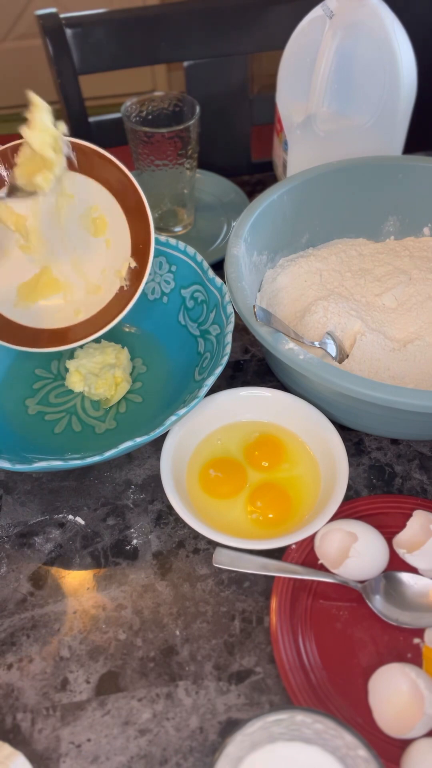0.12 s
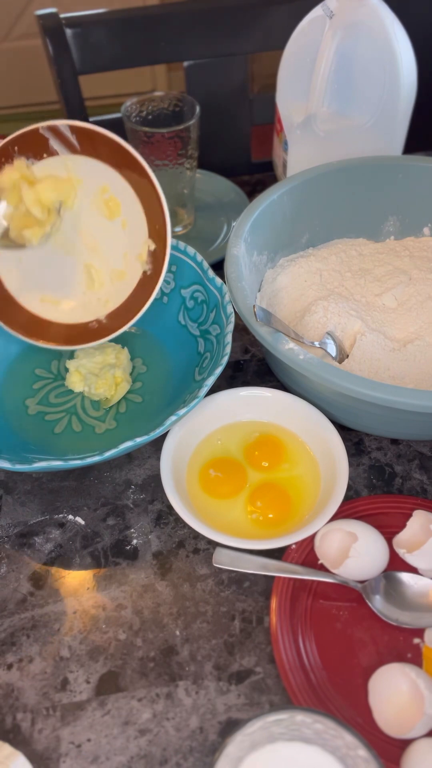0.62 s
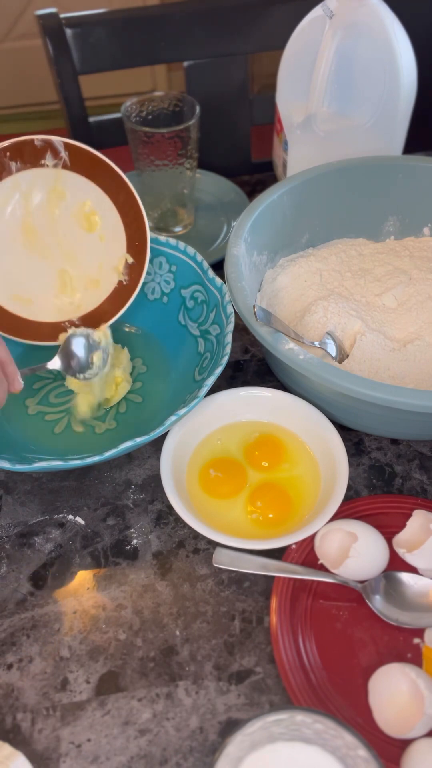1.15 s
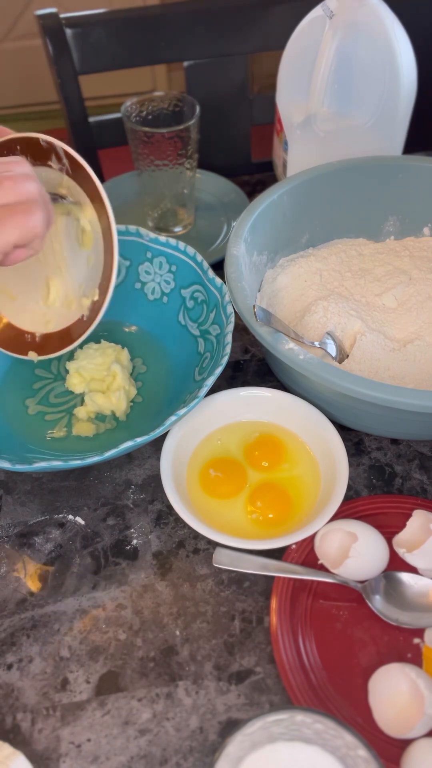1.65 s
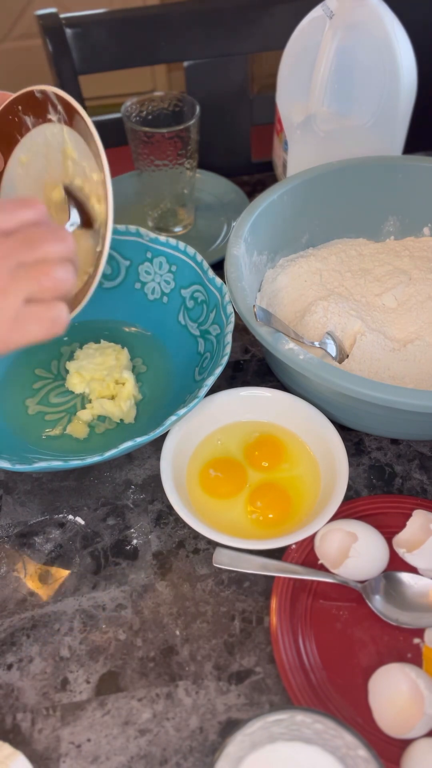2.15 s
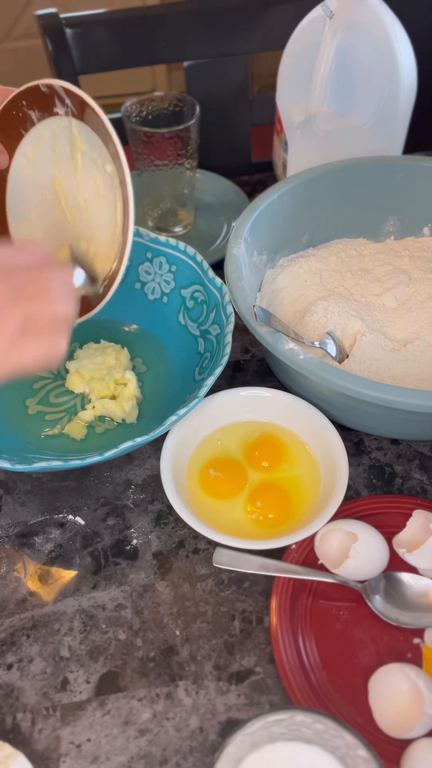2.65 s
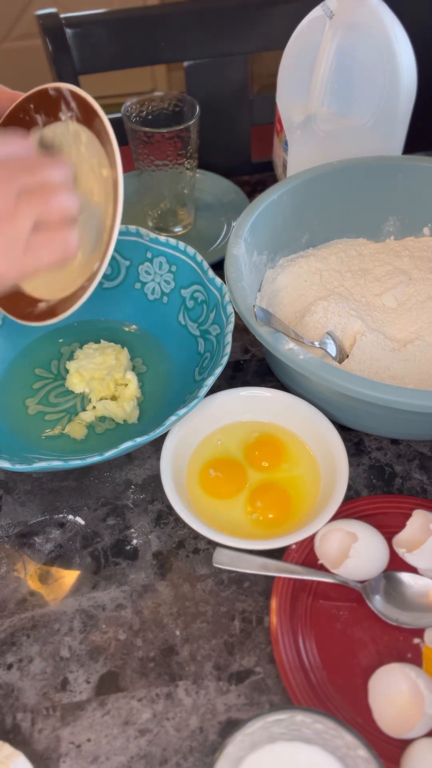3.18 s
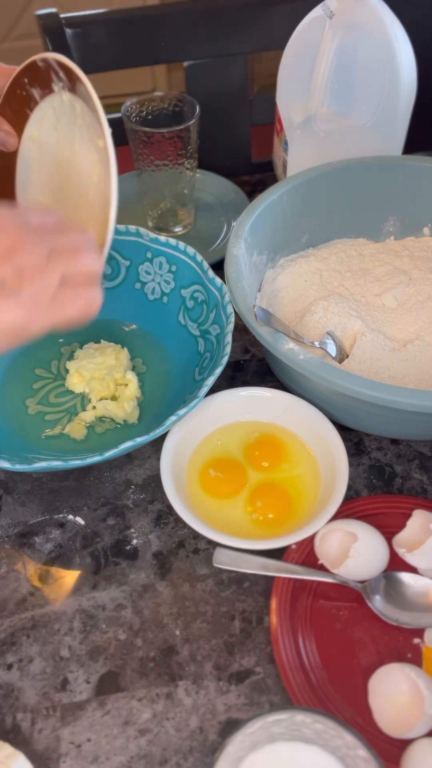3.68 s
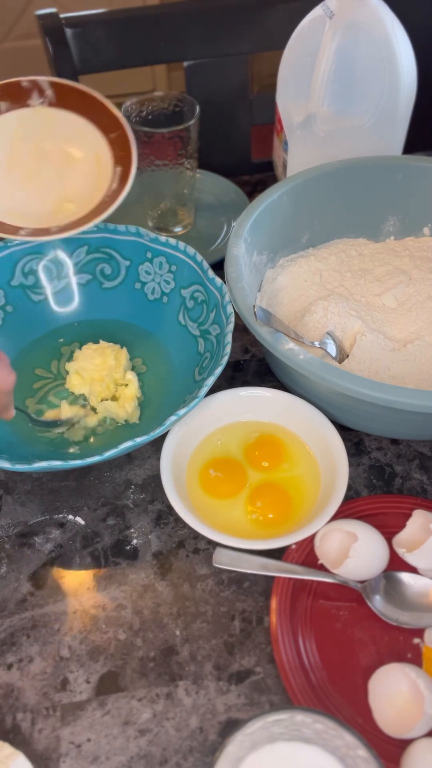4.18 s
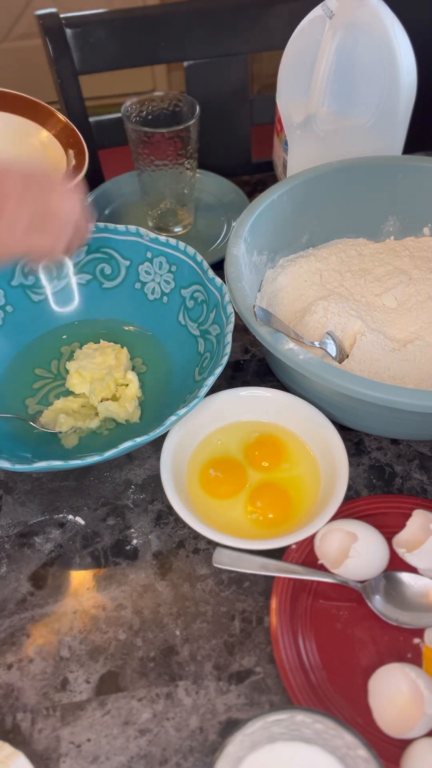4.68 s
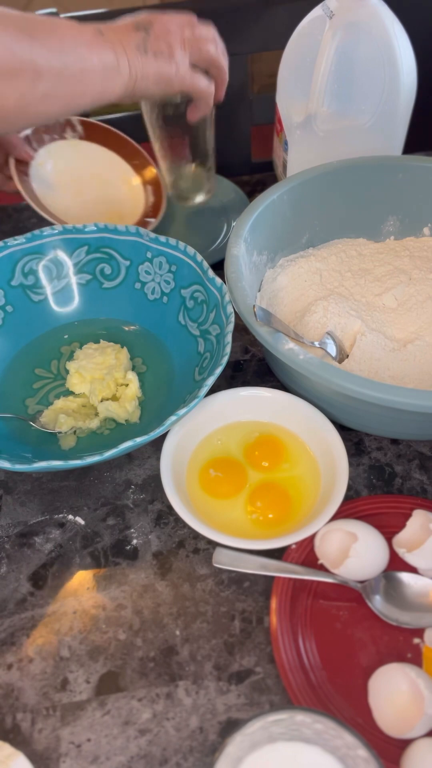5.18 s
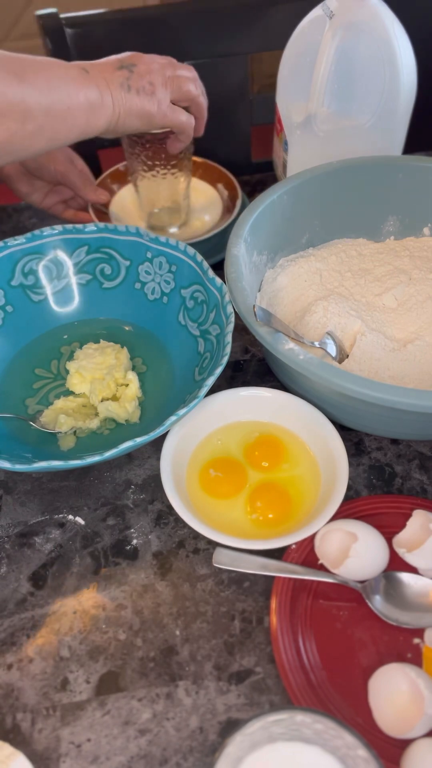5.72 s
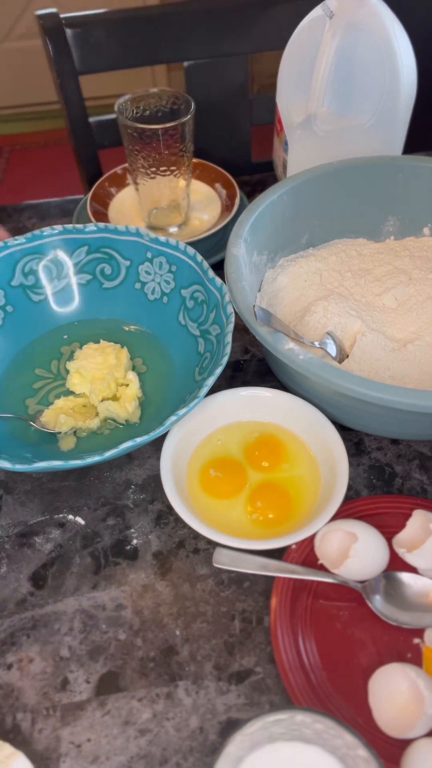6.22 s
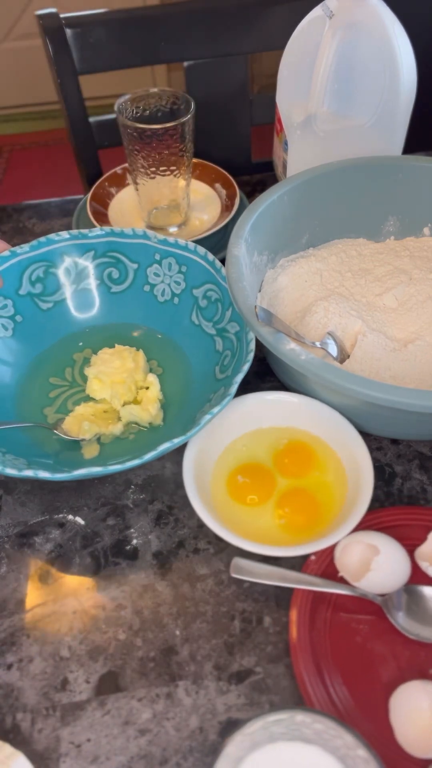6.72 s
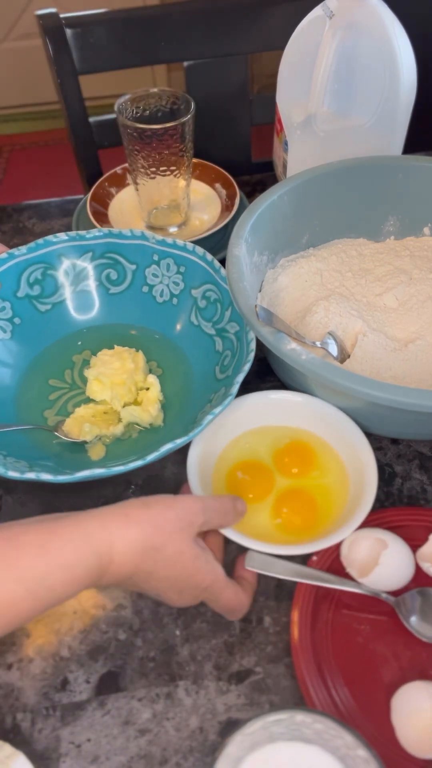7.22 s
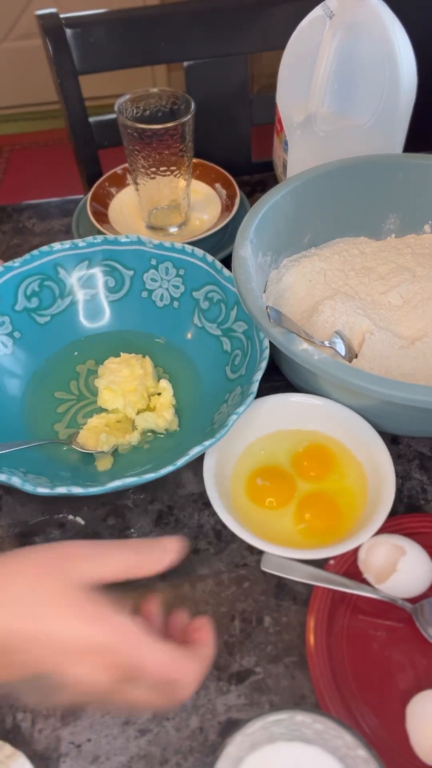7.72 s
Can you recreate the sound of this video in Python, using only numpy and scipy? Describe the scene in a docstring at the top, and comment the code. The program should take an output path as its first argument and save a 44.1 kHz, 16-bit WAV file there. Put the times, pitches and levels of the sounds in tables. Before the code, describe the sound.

A metal spoon scrapes and clinks sharply against a hand-held saucer, then dishes knock together, slide on stone and clink beside a soft appliance hum.

```python
"""Spoon, saucer and crockery on a stone counter

A kitchen, heard from close by on a phone with two microphone ports. A steel spoon taps and scrapes a
hand-held saucer, then drops into a ceramic mixing bowl. The saucer and a tumbler are stacked, a crock is
set down, a small bowl is pulled over the stone and clinks. Blows are decaying modes with a noise crack and
a counter thud; scrapes and drags are grit noise through damped modes; an appliance hums as shaped noise."""
import sys
import numpy as np
from scipy import signal
from scipy.fft import rfft, irfft, next_fast_len
from scipy.io import wavfile
from scipy.ndimage import uniform_filter1d, map_coordinates

SR = 44100
rng = np.random.default_rng(int(sys.argv[2]) if len(sys.argv) > 2 else 0)


def to_wav(sig):
    """Store sig (one row per channel, or 1-D mono) as 16-bit WAV at the path in sys.argv[1].

    Samples outside -1..1 are clipped; the rate is SR.
    """
    pcm = np.clip(np.atleast_2d(sig), -1, 1) * 32767
    pcm = np.round(pcm).astype(np.int16)
    wavfile.write(sys.argv[1], SR, pcm.T)  # frames by channels


def amplitude_ratio(level_db):
    """Convert a level in decibels to the matching linear amplitude (field) ratio."""
    exponent = np.asarray(level_db, float) / 20
    return 10 ** exponent


N = 346626  # length in samples


def unit(x):
    """Scaled to rms 1."""
    return x / np.sqrt(np.mean(x ** 2) + 1e-20)


def peak(x):
    """Scaled to peak 1."""
    return x / np.abs(x).max()


def along(points, hz, column=1):
    """A column of (Hz, value, ..) points, read between them on a log frequency axis."""
    table = np.transpose(points)
    return np.interp(np.log(hz + 1), np.log(table[0] + 1), table[column])


def filtered(x, response):
    """x with its spectrum multiplied by a (complex) function of frequency."""
    m = next_fast_len(x.shape[-1] + 8192)
    return irfft(rfft(x, m) * response(np.fft.rfftfreq(m, 1 / SR)), m)[..., :x.shape[-1]]


def wander(spacing):
    """Smooth random curve through a new normal value every so many samples."""
    return map_coordinates(rng.standard_normal(N // spacing + 4), [np.arange(N) / spacing])


# How alike scattered sound is at the two ports. Each row: frequency in Hz, left-right correlation.
PORT_LIKENESS = [(100, .99), (250, .93), (520, .3), (1500, .6), (3500, .2), (5000, .5), (6500, .8),
                 (8500, .97), (10200, .9), (11700, .4), (13000, .97)]


def diffuse(size):
    """A left-right pair of noises, mixed from mid and side to be as alike as scattered sound is at the ports."""
    turn = lambda hz: np.arccos(along(PORT_LIKENESS, hz)) / 2
    shares = lambda hz: np.array([np.cos(turn(hz)), np.sin(turn(hz))])
    mid, side = filtered(rng.standard_normal((2, size)), shares)
    return np.array([mid + side, mid - side])


# Spectrum of the hum, only its shape counts. Each row: frequency in Hz, density in dB per Hz.
HUM = [(30, -14), (55, 8.5), (123, -5), (217, -7.5), (335, -9), (818, -27.5), (1940, -35), (3080, -40),
       (4370, -34.5), (8000, -45), (16000, -52)]
# Fuzzy tones of the appliance. Each row: centre in Hz, half width in Hz, rms in dB before its drift.
WHINE = [(120, 24, -62), (2100, 730, -78), (4530, 44, -82.5)]


def appliance():
    """A broad hum of shaped noise with a few fuzzy narrow bands that drift in level."""
    hum = amplitude_ratio(-56.5) * unit(filtered(diffuse(N), lambda hz: amplitude_ratio(along(HUM, hz))))
    for centre, width, db in WHINE:
        tone = unit(filtered(diffuse(N), lambda hz: 1 / (1 + ((hz - centre) / width) ** 2)))
        hum = hum + amplitude_ratio(db + 0.7 * wander(8000)) * tone
    return hum


# How long the kitchen rings. Each row: frequency in Hz, t60 in seconds.
KITCHEN = [(100, 0.57), (500, 0.35), (2000, 0.41), (6000, 0.32), (12000, 0.094)]


def kitchen(x, wet_db):
    """The direct sound, close echoes off dishes and counter, then a fresh diffuse tail dying by frequency."""
    hz, t, z = signal.stft(diffuse(SR // 3), SR, nperseg=256)
    close = amplitude_ratio(1.0 - 60 * t / 0.1)
    decay = amplitude_ratio(-60 * t / along(KITCHEN, hz)[:, None]) + close
    tail = signal.istft(z * decay, SR, nperseg=256)[1]
    tail = tail / np.linalg.norm(tail[0])
    tail = np.pad(tail, ((0, 0), (round(.0008 * SR), 0)))  # nearest reflection 0.8 ms late
    return x + amplitude_ratio(wet_db) * signal.fftconvolve(x[None], tail, axes=1)[:, :len(x)]


def in_pieces(x, wet_db):
    """A long sound hears a new kitchen tail every quarter second."""
    out, step = np.zeros((2, N + SR)), SR // 4
    for i in range(0, N, step):
        piece = np.pad(x[i:i + step], (0, SR // 3))
        out[:, i:i + len(piece)] += kitchen(piece, wet_db)
    return out[:, :N]


# Noise of a hard contact, for crack and grit hiss. Each row: frequency in Hz, relative level in dB.
CRACK = [(150, -39), (600, -5.5), (1500, -4.5), (4000, -4), (8000, -9), (14000, -17), (17000, -42)]


def rubbed(modes, grains_db, broad_db, damping):
    """Uneven grit, rms 1, driving the damped modes of the rubbed thing and hissing by itself."""
    grains = np.minimum(rng.exponential(1, N), 5)
    grit = rng.standard_normal(N) * amplitude_ratio(grains_db * (grains + wander(200)))  # the grains come in clumps

    def response(f):
        total = amplitude_ratio(broad_db + along(CRACK, f))
        for k, (centre, db, t60) in enumerate(modes):
            loss = 1j * f * damping * np.log(1000) / np.pi / t60  # shorter t60, wider resonance
            total = total + (-1) ** k * amplitude_ratio(db) * loss / (centre ** 2 - f ** 2 + loss)
        return total

    return unit(filtered(grit, response))


def swells(rows):
    """The gain of pushes that build up and ease off in bell shapes."""
    s, length, db = np.transpose(rows)[..., None]
    t = np.arange(0, N, 64) / SR
    build_share = 0.53  # of the length spent building up
    side = length * np.where(t < s, build_share, 1 - build_share)
    shape = np.exp(-((t - s) / side) ** 2)
    return np.interp(np.arange(N) / SR, t, np.sqrt(np.sum((amplitude_ratio(db) * shape) ** 2, axis=0)))


# Spoon edge pushed over the glaze. Each row: peak time in seconds, length in seconds, level in dB.
SCRAPES = [(.08, 0.063, -55), (.375, 0.042, -49.5), (.5, 0.17, -56.5), (.6, 0.24, -67), (.78, 0.071, -62),
           (1.8, 0.13, -55), (1.93, 0.049, -54), (2.2, 0.097, -42.5), (2.56, 0.19, -55.5),
           (2.68, 0.083, -50.5), (3.04, 0.064, -46.5), (3.35, 0.074, -48), (3.64, 0.17, -52),
           (3.765, 0.078, -48)]
# Modes of the saucer. Each row: frequency in Hz, relative level in dB, t60 in seconds before grip.
SAUCER = [(935, -6.5, 0.068), (1053, 1, 0.027), (2320, -11, 0.097), (3540, 5, 0.032), (4150, -12.5, 0.032),
          (4535, -1.5, 0.042), (4930, -6.5, 0.03), (5920, -6.5, 0.08), (6310, -14, 0.23), (6334, 11, 0.017),
          (7080, -4.5, 0.025), (8040, 0.5, 0.01)]


def spoon_scrapes():
    """The edge catches and lets go; the tone colour drifts at random between two sets of saucer modes."""
    colour_db = 5 * wander(1500)  # one set up, the other down
    rub = lambda modes: rubbed(modes, grains_db=2.5, broad_db=-11, damping=2.6)
    body = amplitude_ratio(colour_db) * rub(SAUCER[::2]) + amplitude_ratio(-colour_db) * rub(SAUCER[1::2])
    slips_per_s, slip_db, slip_s = 60, 5, .004
    slips = (rng.random(N) < slips_per_s / SR) * rng.random(N)
    catch = 1 + amplitude_ratio(slip_db) * signal.lfilter([1], [1, -np.exp(-1 / (slip_s * SR))], slips)
    return swells(SCRAPES) * unit(catch) * unit(body)


def ring(modes, t, tilt_db, blur_hz, spot_hz=()):
    """Every mode at a slightly random strength, its phase wandering at random so the tone is blurred."""
    hz, db, t60 = np.transpose(modes)[..., None]
    db = db + tilt_db * np.log2(hz / 2000) + rng.normal(0, 1.0, hz.shape)
    for c in spot_hz:
        db = db + 7 * np.exp(-(np.log2(hz / c) / .12) ** 2)  # up to 7 dB louder within about .12 octave
    # smooth steps, so lines blur without hiss
    steps = uniform_filter1d(rng.standard_normal((len(modes), len(t))), size=96, axis=1)
    drift = np.cumsum(steps, axis=1) * np.sqrt(2 * np.pi * abs(blur_hz) / SR)
    return np.sum(amplitude_ratio(db - 60 * t / t60) * np.sin(2 * np.pi * hz * t + drift), axis=0)


MIDDLING_DB = -20  # peak of a middling blow
# Modes of the stone counter; the first row is low rumble of the handled phone, used in drags only.
# Each row: frequency in Hz, relative level in dB, t60 in seconds before grip.
COUNTER = [(70, 22, 0.26), (139.6, -3, 0.073), (186, 2.5, 0.068), (289, 0, 0.096), (347, 6, 0.06),
           (427, 14, 0.018)]


def blows(events, modes, middling_s, doublings, blur_hz, wet_db):
    """A chattering contact rings the thing, cracks, thuds the counter and wakes the kitchen.
    It chatters for middling_s under a middling blow, with so many doublings per 10 dB of strength."""
    out, t = np.zeros((2, N + SR)), np.arange(SR // 3) / SR
    grip = 0.36 + np.exp(-t / 0.016)  # hand and neighbours soak up the first burst
    for s, db, tilt_db, thud_db, crack_db, *spot_hz in events:
        chatter_s = max(middling_s * 2 ** (doublings * (db - MIDDLING_DB) / 10), .0005)
        u = t / chatter_s
        contact = rng.standard_normal(len(t)) * u * np.exp(-4 * u)  # swells and dies
        onset = (1 - np.exp(-2.5 * u)) ** 2
        body = peak(ring(modes, t, tilt_db, blur_hz, spot_hz) * grip * onset)

        def crack_response(hz):
            tilted_db = tilt_db * np.log2(np.maximum(hz, 800) / 2000)
            dull_db = 2.3 * min(tilt_db, 0) * np.log2(np.maximum(hz / 7000, 1))  # blunt blows lose the top
            return amplitude_ratio(along(CRACK, hz) + tilted_db + dull_db)

        crack = peak(filtered(contact, crack_response))
        thud = peak(ring(COUNTER[1:], t, 0, blur_hz=6.3) * grip * (1 - np.exp(-t / 0.0021)))
        sound = body + amplitude_ratio(crack_db) * crack + amplitude_ratio(thud_db) * thud
        out[:, round(s * SR):][:, :len(t)] += amplitude_ratio(db) * kitchen(sound, wet_db)
    return out[:, :N]


# Spoon on the hand-held saucer. Each row: start in seconds, peak of the ring in dB, tilt in dB per octave,
# pitch that the struck spot favours in Hz.
SPOON_TAPS = [(0.291, -41, 1.5, 1000), (0.378, -36.5, 10.5, 7080), (0.398, -44, -3.5, 970),
              (0.492, -38.5, 2.5, 6300), (0.512, -49, 2, 6300), (1.148, -56.5, 1, 1020),
              (1.575, -12.5, 0, 4930), (2.133, -16, 0.5, 5920), (2.193, -33, 11, 6310),
              (2.208, -26, 4, 6166), (2.484, -10, 1.5, 2320), (2.518, -25, 2, 3540),
              (2.921, -37, 0.5, 6310), (3.246, -24, 2, 6310), (3.39, -39.5, 1, 1020),
              (3.546, -14.5, 1.5, 3540), (3.763, -37.5, 5, 6310)]


def spoon_taps():
    """The saucer is in the hand, so the counter hardly thuds; softer taps crack more against their ring."""
    taps = []
    for s, db, tilt_db, spot_hz in SPOON_TAPS:
        crack_db = 2 + 0.1954 * (MIDDLING_DB - db)
        taps.append((s, db, tilt_db, -26.5, crack_db, spot_hz))
    return blows(taps, SAUCER, middling_s=0.0026, doublings=0.12, blur_hz=61.6, wet_db=-1.5)


# The spoon lands in the bowl. Each row: start in seconds, peak of the ring in dB, tilt in dB per octave,
# counter thud and dry crack in dB over the ring.
SPOON_DROP = [(4.173, -24.5, -4.5, 0.5, 14), (4.357, -11.5, 0, -13.5, -2)]
# Modes of the mixing bowl. Each row: frequency in Hz, relative level in dB, t60 in seconds before grip.
MIXING_BOWL = [(1150, 4, 0.022), (1750, 3, 0.05), (2216, 7, 0.05), (2480, 9, 0.05), (2545, 19, 0.04),
               (2885, 8, 0.05), (3350, 8, 0.05), (3800, 3, 0.05), (5841, -4, 0.04)]


def spoon_drop():
    """The falling spoon rings the ceramic mixing bowl's modes."""
    return blows(SPOON_DROP, MIXING_BOWL, middling_s=0.0058, doublings=0.41, blur_hz=50, wet_db=-2.5)


# Dishes dragged on stone, one table a drag: stacking, setting down, pulling the small bowl.
# Each row: time in seconds, body level in dB, grit level in dB.
SHIFT = [(4.8, -80.5, -80), (5.05, -66, -88), (5.27, -80.5, -100)]
SET_DOWN = [(5.959, -69, -73.5), (6.061, -64.5, -95.5), (6.253, -70.5, -65.5), (6.38, -45.5, -59),
            (6.49, -49.5, -66.5), (6.6, -53, -56.5), (6.69, -59.5, -73.5), (6.743, -61, -63.5),
            (6.83, -70, -86.5)]
PULL = [(7.085, -65.5, -85), (7.11, -54, -54.5), (7.19, -44, -88), (7.24, -74.5, -73), (7.3, -58, -80),
        (7.421, -55.5, -60), (7.53, -45.5, -71), (7.58, -50, -68), (7.641, -47.5, -81), (7.86, -58.5, -80)]


def drag_gain(column):
    """The gain of one level column along every drag, silent between them."""
    t, gain = np.arange(N) / SR, np.zeros(N)
    for rows in map(np.transpose, (SHIFT, SET_DOWN, PULL)):
        gain += amplitude_ratio(np.interp(t, rows[0], rows[column], -np.inf, -np.inf))
    return gain


def dish_drags():
    """Grit noise through phone rumble, counter and stack modes, plus hiss through heavily damped crock modes."""
    body = rubbed(COUNTER + STACK[:5], grains_db=3.5, broad_db=-15, damping=6.2)
    sand = rubbed(CROCK[4:], grains_db=5.0, broad_db=0.0, damping=24.0)
    return drag_gain(1) * body + drag_gain(2) * sand


# Knocks of the stacking. Each row: start in seconds, peak of the ring in dB, tilt in dB per octave,
# counter thud and dry crack in dB over the ring.
STACKING = [(5.292, -27, -8.5, 12, 14.5), (5.313, -23, -7.5, -4.5, -3), (5.332, -32.5, -8.5, 12, 4.5),
            (5.435, -30.5, -9.5, 11, 9)]
# Modes of the stack. Each row: frequency in Hz, relative level in dB, t60 in seconds before grip.
STACK = [(827, -8, 0.15), (1562, 4, 0.09), (1992, -0.5, 0.11), (2535, -4, 0.29), (3830, -9, 0.17),
         (4550, -3, 0.23), (5100, 1, 0.073)]


def stacking():
    """Short knocks ring the modes of the stacked dishes."""
    return blows(STACKING, STACK, middling_s=0.0021, doublings=0.08, blur_hz=61.0, wet_db=2.5)


# The tumbler is set. Each row: start in seconds, peak of the ring in dB, tilt in dB per octave,
# counter thud and dry crack in dB over the ring.
TUMBLER_SET = [(5.659, -10.5, -6.5, -5.5, 1.5), (5.751, -31, -5, 13, -5), (5.774, -36.5, -10, 18, 11.5),
               (5.811, -29.5, -16.5, 3.5, -1), (6.029, -56.5, -16.5, 8, 11.5)]
# Modes of the tumbler. Each row: frequency in Hz, relative level in dB, t60 in seconds before grip.
TUMBLER = [(1122, 11.5, 0.02), (1299, 3, 0.052), (1790, 13.5, 0.027), (3650, -0.5, 0.13), (4470, 4, 0.1),
           (5060, -4.5, 0.087), (5870, -2.5, 0.19), (6700, -18, 0.1), (8450, 4.5, 0.098)]


def tumbler():
    """Short knocks ring the tumbler's modes as it joins the stack."""
    return blows(TUMBLER_SET, TUMBLER, middling_s=0.0021, doublings=0.08, blur_hz=39.2, wet_db=3.0)


# The crock meets the stone. Each row: start in seconds, peak of the ring in dB, tilt in dB per octave,
# counter thud and dry crack in dB over the ring.
CROCK_KNOCKS = [(6.272, -21.5, -1, -1.5, -0.5), (6.277, -8, -2, -12.5, -6.5), (6.498, -40, -2, -10, 5),
                (6.588, -44, -9, -6, 14.5)]
# Modes of the crock. Each row: frequency in Hz, relative level in dB, t60 in seconds before grip.
CROCK = [(680, 0, 0.03), (1930, 8, 0.028), (2850, -6, .03), (3230, -4, 0.035), (3570, -7, 0.04),
         (5087, -7, 0.035), (6960, -4, 0.025)]


def crock():
    """Setting down the crock rings its short, dull modes."""
    return blows(CROCK_KNOCKS, CROCK, middling_s=0.0036, doublings=0.23, blur_hz=59, wet_db=-3.5)


# The small bowl's foot stutters. Each row: centre in seconds, half length in seconds, pitch in Hz, level in dB.
GROANS = [(7.1, 0.0036, 1384, -40), (7.129, 0.01, 1960, -37), (7.278, 0.0053, 1490, -41.5)]


def groans():
    """Brief bell-shaped bursts of grit through a single mode each, as the foot stutters."""
    t, out = np.arange(N) / SR, np.zeros(N)
    for s, half, hz, db in GROANS:
        tone = rubbed([(hz, 0, .03)], grains_db=-4.0, broad_db=-40.5, damping=1.3)
        out += amplitude_ratio(db) * np.exp(-((t - s) / half) ** 2) * tone
    return out


# The small bowl clinks. Each row: start in seconds, peak of the ring in dB, tilt in dB per octave,
# counter thud and dry crack in dB over the ring.
BOWL_CLINKS = [(7.155, -32, 0, 0, 0.5), (7.177, -40, -15, 13, 19), (7.273, -49.5, -4, -15, 9),
               (7.350, -44, -5.5, -4, 9), (7.533, -37, -2, -17, 3.5), (7.647, -42, -5.5, 6.5, 19),
               (7.700, -21.5, -5, -6, 5.5), (7.706, -4.5, -2.5, -9, -5.5)]
# Modes of the small bowl. Each row: frequency in Hz, relative level in dB, t60 in seconds before grip.
SMALL_BOWL = [(1230, 2, 0.017), (1801, 5.5, 0.06), (2117, 5, 0.025), (3128, 0, 0.09), (3175, -2, 0.09),
              (3480, -2, 0.03), (4925, -3.5, 0.2), (7030, -3, 0.04)]


def bowl_clinks():
    """Knocks ring the small bowl's modes with little blur."""
    return blows(BOWL_CLINKS, SMALL_BOWL, middling_s=0.0052, doublings=0.51, blur_hz=8.6, wet_db=-4.0)


def scene():
    """Everything in the kitchen: the hum, the friction, the blows."""
    friction = in_pieces(spoon_scrapes() + dish_drags() + groans(), wet_db=-3.0)
    spoon = spoon_taps() + spoon_drop()
    dishes = stacking() + tumbler() + crock() + bowl_clinks()
    return appliance() + friction + spoon + dishes


def top_cut(x):
    """Nothing passes above the cut-off."""
    return signal.sosfilt(signal.butter(12, 16530, fs=SR, output="sos"), x)


# The phone's two ports. Each row: frequency in Hz, left over right in dB, lead of the right in radians.
PORTS = [(180, 1.5, 0), (350, 7, .3), (600, 6, .8), (1500, 6, 1.3), (2200, 6, 1.6), (2950, 2, 1.8),
         (3250, 1, 3.2), (3500, .5, 5.6), (6000, .5, 5.1), (8000, 0, 3.6), (9000, 0, 3.1), (10500, 0, 2.8),
         (12800, 0, 0)]


def record(dry):
    """The ports differ in level and phase, half on each side, and lose the deepest bass."""
    half = lambda hz: amplitude_ratio(along(PORTS, hz) / 2) * np.exp(-.5j * along(PORTS, hz, column=2))
    bass_cut = lambda hz: (1j * hz / (50 + 1j * hz)) ** 3  # three first-order cuts at 50 Hz
    mix = filtered(dry, lambda hz: bass_cut(hz) * np.array([half(hz), 1 / half(hz)]))
    return top_cut(mix)


dry = scene()
out = record(dry)
to_wav(out)
```